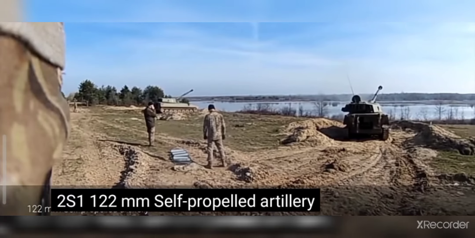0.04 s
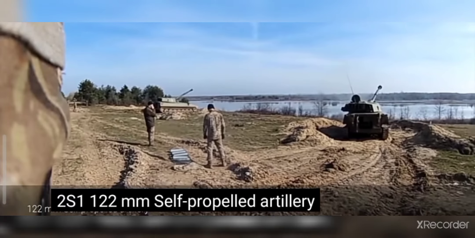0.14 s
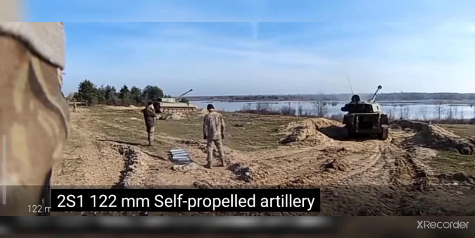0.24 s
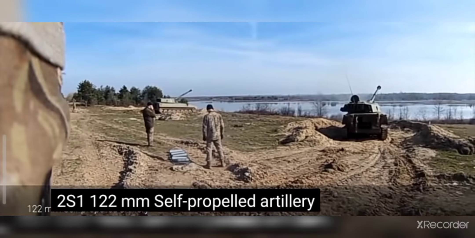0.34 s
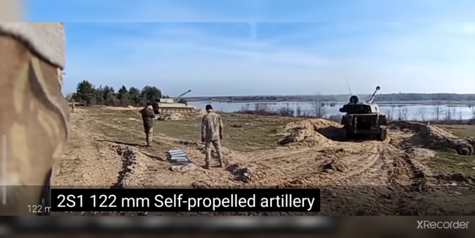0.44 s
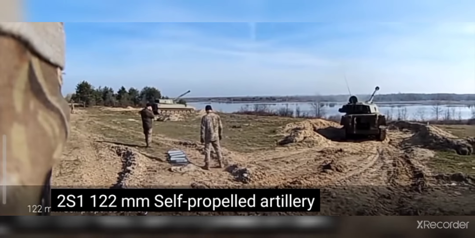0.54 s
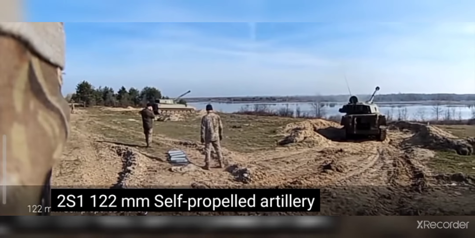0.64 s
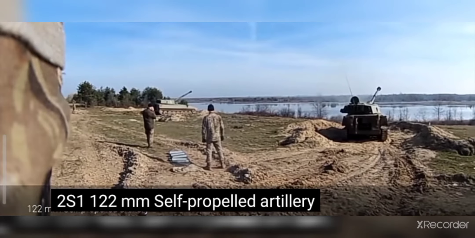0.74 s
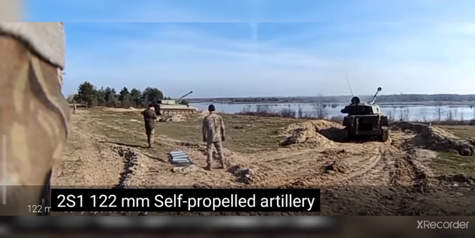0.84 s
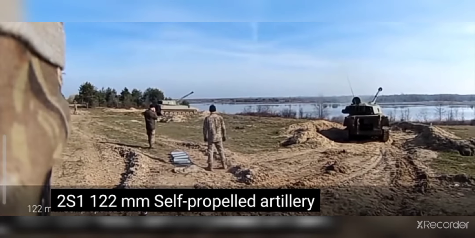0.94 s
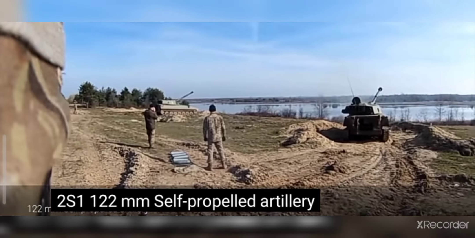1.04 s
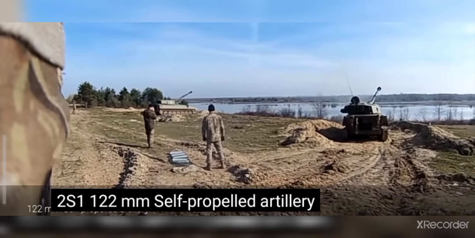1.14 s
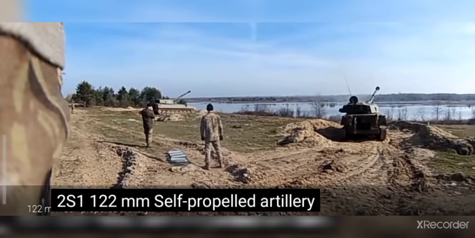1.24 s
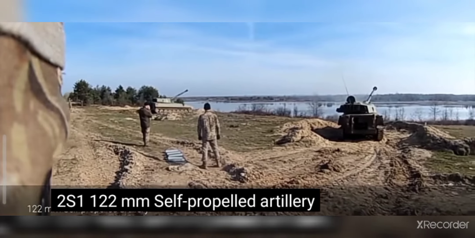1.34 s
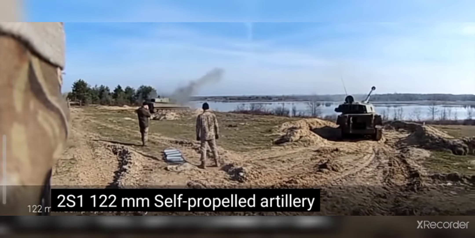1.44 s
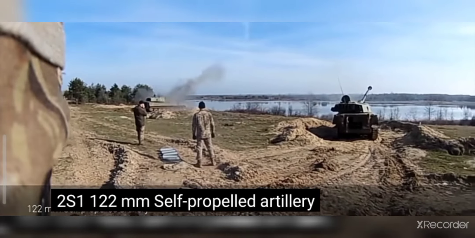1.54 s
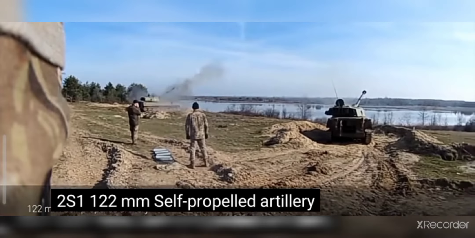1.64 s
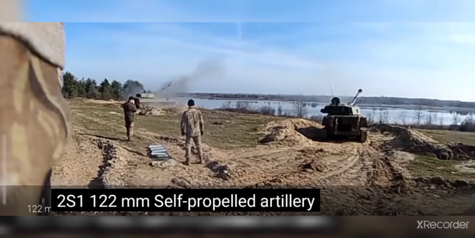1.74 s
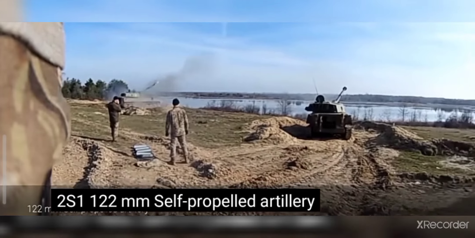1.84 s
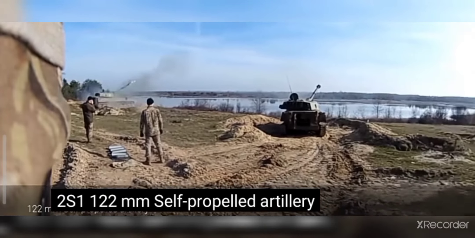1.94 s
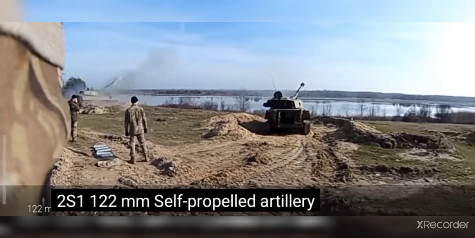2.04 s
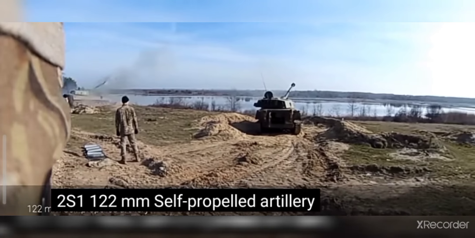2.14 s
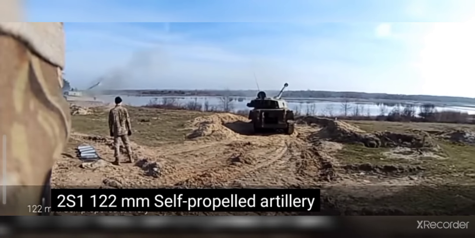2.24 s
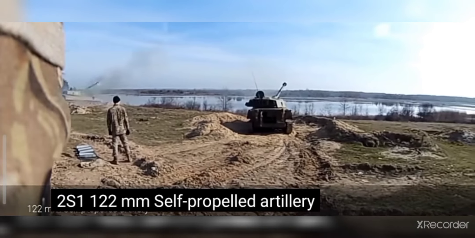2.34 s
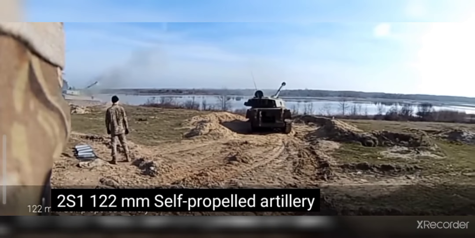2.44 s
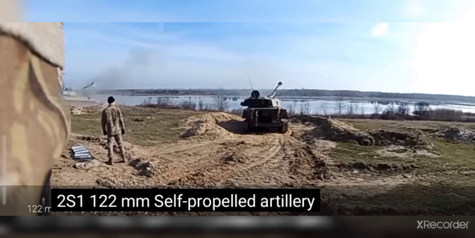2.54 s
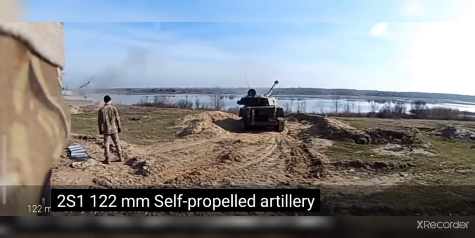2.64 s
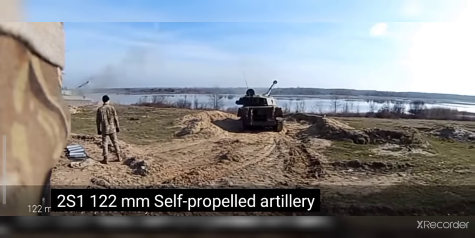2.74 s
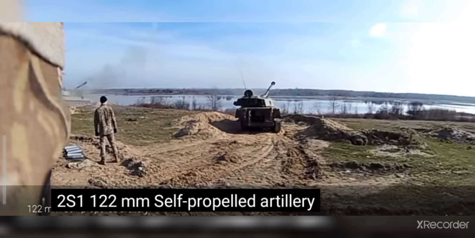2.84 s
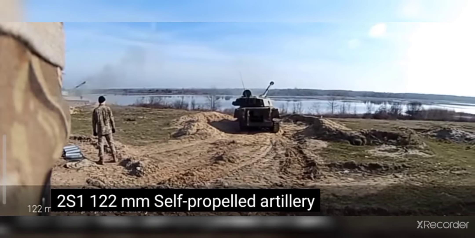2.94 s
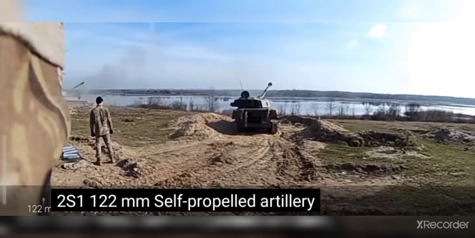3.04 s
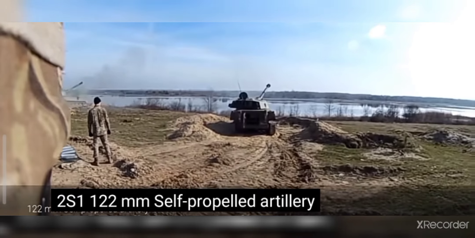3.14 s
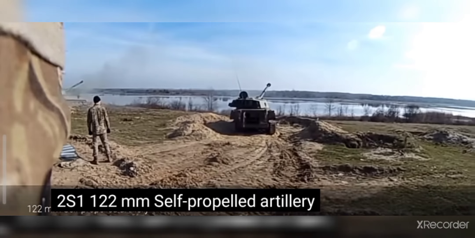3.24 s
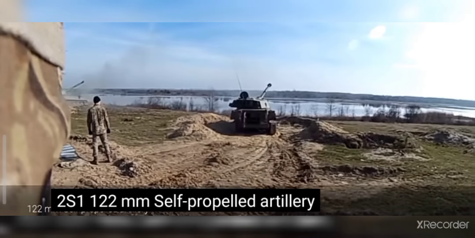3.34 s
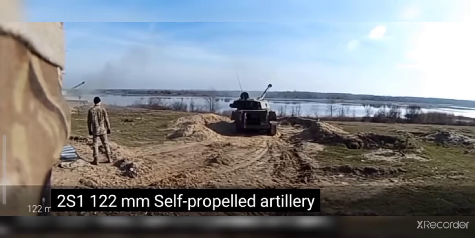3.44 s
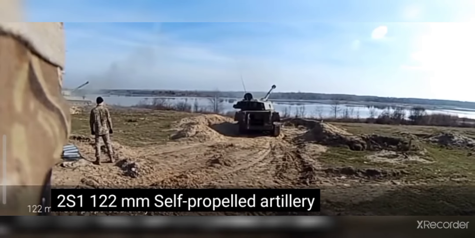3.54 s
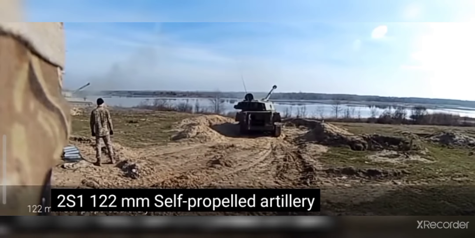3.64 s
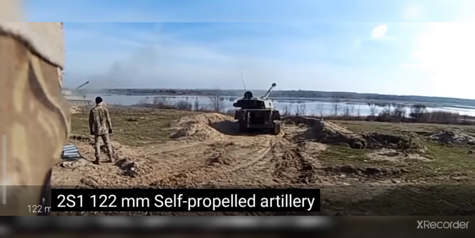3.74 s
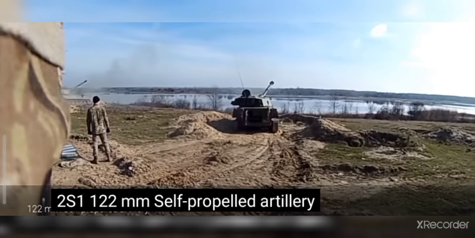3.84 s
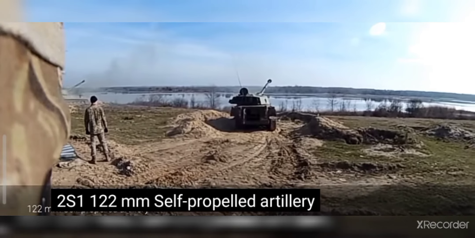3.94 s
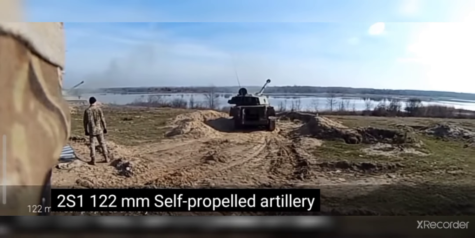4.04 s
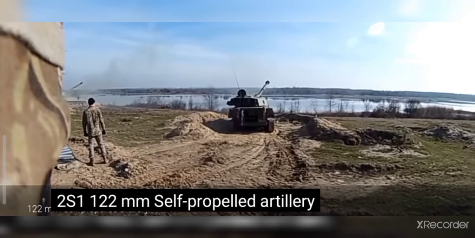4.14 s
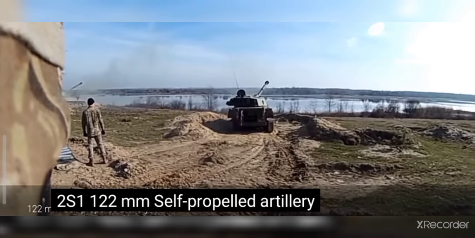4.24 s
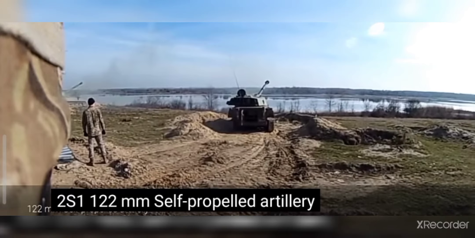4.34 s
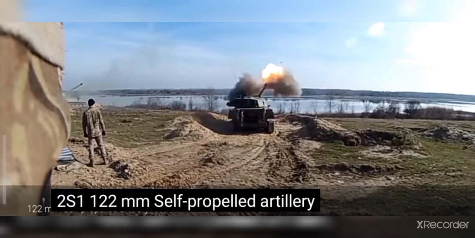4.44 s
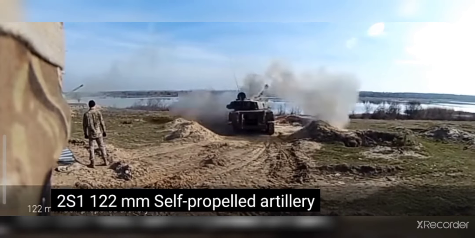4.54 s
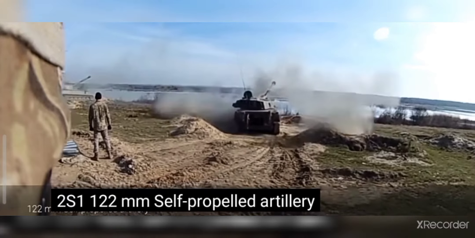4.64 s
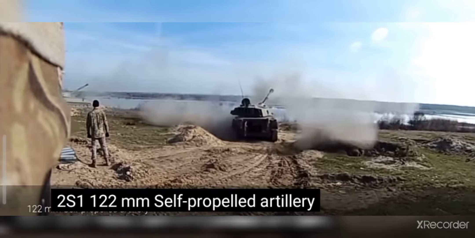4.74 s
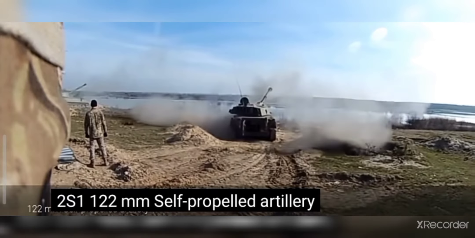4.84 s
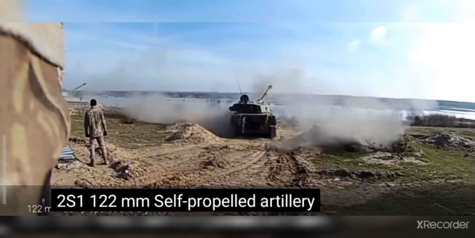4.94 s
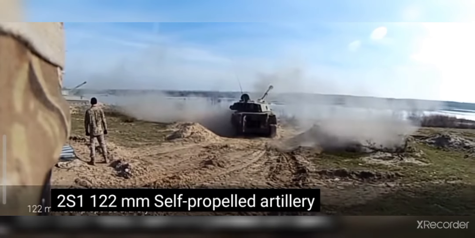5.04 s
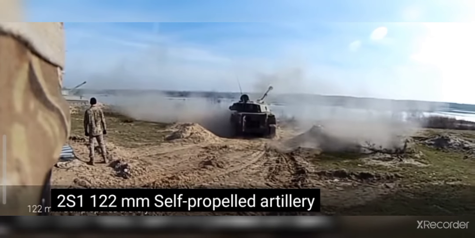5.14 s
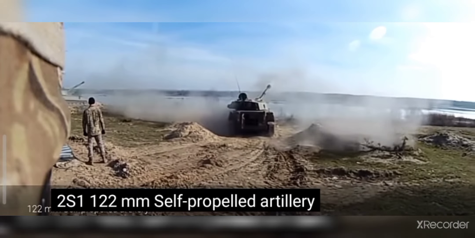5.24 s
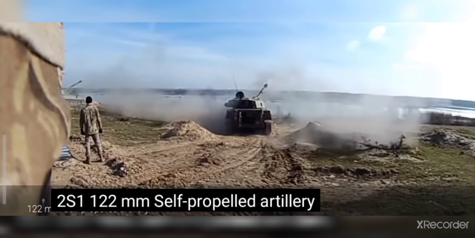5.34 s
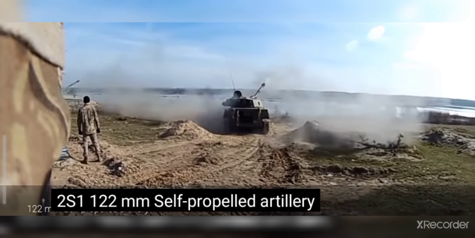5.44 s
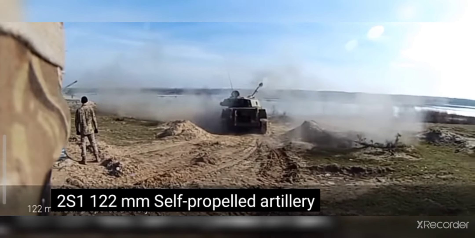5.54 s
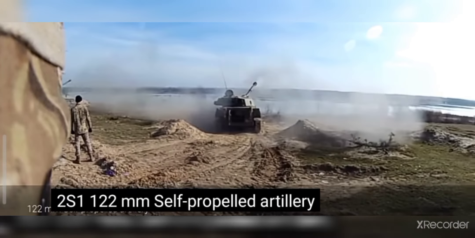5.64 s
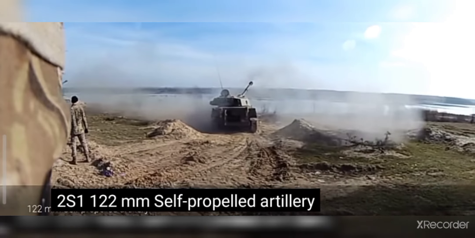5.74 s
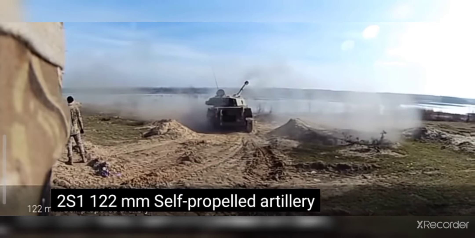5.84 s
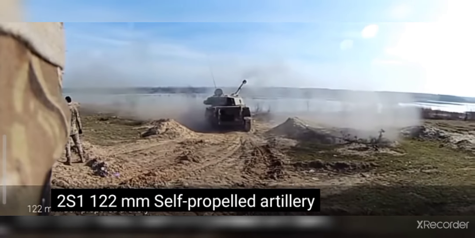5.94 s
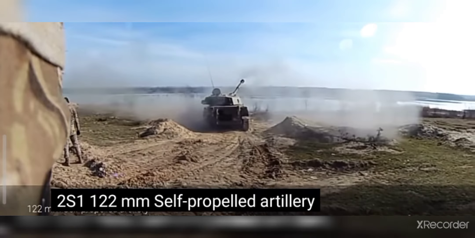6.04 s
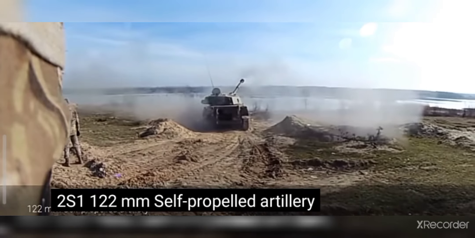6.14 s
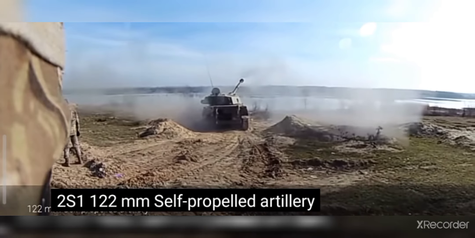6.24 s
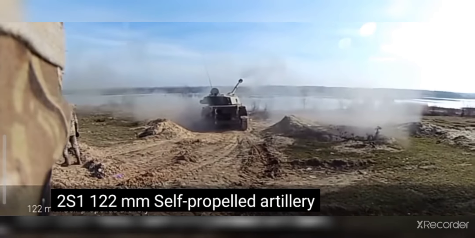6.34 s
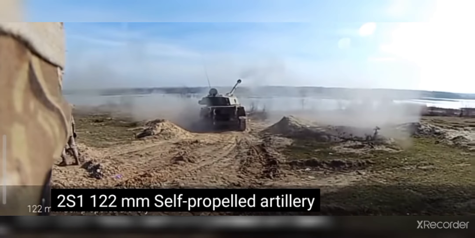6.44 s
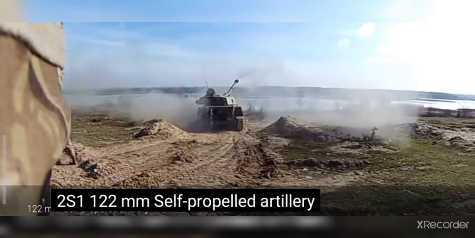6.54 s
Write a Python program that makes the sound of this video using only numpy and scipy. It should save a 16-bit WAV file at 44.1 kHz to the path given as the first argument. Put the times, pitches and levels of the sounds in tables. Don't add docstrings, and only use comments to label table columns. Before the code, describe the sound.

A steady low idle with faint clatter opens the scene. One cannon blast slams the small microphone into clipping, followed by echoes from distant woods and a thin gas leak. As it dies to a rumble, a second, stronger blast hits, with a crackling roar, a hard metallic knock, a bright ringing clang and short puffs of gas, while the engine idles on beneath.

```python
import sys
import numpy as np
from scipy import signal
from scipy.io import wavfile
from scipy.ndimage import uniform_filter1d

SR = 44100
rng = np.random.default_rng(int(sys.argv[2]) if len(sys.argv) > 2 else 0)


def transcribe(signal):
    frames = np.atleast_2d(signal).T
    limited = np.clip(frames, -1, 1)
    pcm = np.round(limited * 32767).astype(np.int16)
    wavfile.write(sys.argv[1], SR, pcm)


def volts_from_decibels(level):
    exponent = np.asarray(level, float) / 20
    return 10 ** exponent


N = 290735
T = np.arange(N) / SR
# [f/Hz, level/dB per Hz]
HISS = [(2650, -42.5), (4500, -8.5), (4700, -13), (5610, -16.5), (6670, 0.5), (7500, -1), (8720, -6),
        (9450, -17), (10000, -17), (13000, -47.5), (22000, -120)]
AIR = [(2650, -41), (4500, -12), (5710, -12.5), (6910, -2.5), (8220, -7.5), (9890, -15), (12800, -18.5),
       (14100, -16.5), (15500, -29.5), (16500, -91)]


def evened(x):
    return x / np.sqrt(np.mean(x ** 2) + 1e-20)


def add(mix, s, sound):
    part = mix[round(s * SR):][:len(sound)]
    part += sound[:len(part)]


def noise(colour, patchy_db, flicker_db, size=512):
    frames, hz = N // (size // 4) + 5, np.fft.rfftfreq(size, 1 / SR)
    a, b, patches = rng.standard_normal((frames, len(hz), 3)).T
    patches = uniform_filter1d(patches, size=5, axis=0)
    patches = evened(uniform_filter1d(patches, size=16, axis=1))
    flicker = evened(uniform_filter1d(rng.standard_normal(frames), size=4))
    f, db = np.transpose(colour)
    shape_db = np.interp(np.log(hz + 1), np.log(f + 1), db, left=-120, right=-120)
    z = (a + 1j * b) * volts_from_decibels(shape_db[:, None] + patchy_db * patches + flicker_db * flicker)
    return evened(signal.istft(z, nperseg=size, noverlap=size * 3 // 4)[1][:N])


def shock(hz):
    u = np.arange(int(1.5 * SR / hz) + 8) * 2 * np.pi * hz / SR
    return (1 - u) * np.exp(-u)


def resonate(x, hz, width):
    turn = np.exp(2j * np.pi * np.cumsum(hz) / SR)
    r = np.exp(-np.pi * width / SR)
    return 2 * (turn * signal.lfilter([1 - r], [1, -r], x / turn)).real


def engine():
    # [firing rate f/Hz, rumble level/dB]
    idle = (40.9, -45)
    # [multiple of the firing rate, level/dB, blur width f/Hz]
    orders = [(1, -54, 8), (2, -56.5, 14), (3, -48.5, 7), (4, -57.5, 17), (5, -59.5, 7.6), (6, -66, 25),
              (7, -69.5, 34)]
    # [f/Hz, level/dB per Hz]
    idle_low = [(9, -28.5), (15, -9), (43, -2), (75, -3), (97, -7.5), (128, -2.5), (152, -14.5),
                (210, -21.5), (330, -36.5), (430, -59.5)]
    # [f/Hz, level/dB per Hz]
    idle_high = [(190, -33), (330, -5), (450, -10), (750, -14), (1080, -10.5), (1400, -5), (1700, -6.5),
                 (2000, -1), (2470, -15), (2770, -10), (4090, -30.5), (6040, -26), (14500, -30.5),
                 (16000, -35.5)]
    clatter_db = -61.5
    settle_hz, settle_at_s, settle_s = 2.1, 0.4206, .07

    out = volts_from_decibels(idle[1]) * noise(idle_low, 1, 0, size=4096)
    out += volts_from_decibels(clatter_db) * noise(idle_high, 1.6, 1.4)
    rate_hz = idle[0] + settle_hz / 2 * (1 - np.tanh((T - settle_at_s) / settle_s))
    turns = np.cumsum(rate_hz) / SR
    for k, db, blur in orders:
        r = np.exp(-np.pi * blur / SR)
        draws = rng.standard_normal(N) + 1j * rng.standard_normal(N)
        uneven = signal.lfilter([1], [1, -2 * r, r * r], draws)
        steady = 1.24 * (k == 3)
        turn = np.exp(2j * np.pi * (k * turns + rng.random()))
        blurred = evened((uneven * turn).real)
        out += volts_from_decibels(db) * (steady * turn.real + (.7 - .35 * steady) * blurred)
    return out


def puffs():
    # [t/s, level/dB, length/s]
    puff_list = [
        (2.003, -64.5, 1.38),
        (3.776, -64.5, 0.059),
        (4.019, -81, .05),
        (4.135, -91, .03),
        (5.277, -42.5, 0.047),
        (5.29, -57, 0.65),
        (5.39, -53, .11),
        (5.548, -48, 0.077),
        (5.625, -57.5, 0.1),
    ]
    gas = noise(HISS, 2.1, 1.3) + 0.63 * noise(AIR, 1.6, 1.4)
    gate = np.zeros(N)
    for s, db, length in puff_list:
        u = np.linspace(0, 1, int(length * SR))
        add(gate, s, volts_from_decibels(db) * np.minimum(u / 0.13, 1) * (1 - u ** 1.23))
    return gas * gate


def vent():
    # [t/s, level/dB, centre f/Hz]
    vents = [
        [(1.5, -40, 2920), (2.2, -61, 2900), (2.45, -58, 2900), (2.65, -54, 2900), (3.25, -63, 2770)],
        [(4.75, -30.5, 3000), (4.97, -32.5, 3000), (5.1, -30.5, 3100), (5.25, -39.5, 3680), (5.33, -41, 3090),
         (5.7, -42, 2880), (6.45, -60, 2800)],
    ]
    out = np.zeros(N)
    gas = noise([(1500, 5.5), (4200, -2.5), (4800, -18)], 2.5, 0.86)
    for rows in vents:
        s, db, hz = np.transpose(rows)
        on = (T > s[0]) & (T < s[-1])
        t, jet = T[on], gas[on]
        for _ in range(2):
            jet = resonate(jet, np.interp(t, s, hz), 1000)
        gate = np.clip(np.minimum(t - s[0], s[-1] - t) / 0.04, 0, 1)
        out[on] = volts_from_decibels(np.interp(t, s, db) - 2.5) * evened(jet) * gate
    return out


def metal(hit, modes, burst_db, burst_s):
    t = np.arange(SR // 2) / SR
    ring = np.zeros(len(t))
    for hz, db, t60, beat_hz, swell in modes:
        tone = volts_from_decibels(db - 60 * t / t60) * np.sin(2 * np.pi * (hz * t + rng.random()))
        ring += tone * (1 + 0.55 * np.cos(2 * np.pi * beat_hz * (t - swell)))
    rattle = evened(uniform_filter1d(rng.standard_normal(len(t)), size=250))
    ring = ring * (1 + 0.3 * rattle) * (1 - np.exp(-t / 0.0013))
    contact = signal.lfilter(*signal.butter(3, [800, 3200], "band", fs=SR), rng.standard_normal(len(t)))
    out = np.zeros(N)
    add(out, hit[0], volts_from_decibels(hit[1]) * (0.35 * ring + contact * volts_from_decibels(burst_db - 60 * t / burst_s)))
    return out


def breech_knock():
    # [t/s, level/dB]
    breech = (4.918, -15.5)
    # [f/Hz, level/dB, t60/s, beat f/Hz, delay of first swell/s]
    breech_modes = [(1394, -1.5, 0.21, 10, 0.018), (2040, -0.5, .15, 14, .02), (2460, -2, .1, 12, .015)]
    return metal(breech, breech_modes, burst_db=0.0, burst_s=0.24)


def spent_case():
    # [t/s, level/dB]
    case = (5.279, -17.5)
    # [f/Hz, level/dB, t60/s, beat f/Hz, delay of first swell/s]
    case_modes = [(1010, -9, 0.72, 12, 0.043), (1180, 2, 0.03, 5, 0), (1625, -7.5, 0.86, 13, 0.047),
                  (2185, -6, 0.26, 15, 0), (2543, 3.5, 0.39, 12.4, 0.016), (2724, -3, 0.44, 11, 0.037),
                  (3090, -11, 0.63, 9, 0.076), (4720, -16.5, 0.24, 10, 0.063), (7340, -21, 0.29, 10, 0.033)]
    return metal(case, case_modes, burst_db=1.2, burst_s=0.064)


def slaps():
    # [t/s, peak level/dB, colour f/Hz, smear level/dB,
    # top f/Hz left by the air]
    slap_list = [(1.687, -12.5, 1000, -6, 2400), (2.092, -33, 620, -5, 1300),
                 (2.298, -22, 1000, -17.5, 3660), (2.333, -19.5, 1000, -12, 2230),
                 (2.434, -34, 630, -8, 1500), (2.467, -25, 970, -12, 1800), (2.508, -32, 840, -12, 1400),
                 (2.566, -36, 940, -5, 1600), (2.712, -38.5, 1050, 3, 2820), (2.798, -40, 640, -8, 1300),
                 (3.382, -43, 600, 6.5, 1100), (4.748, -31, 730, -10, 3000), (4.807, -14, 1640, -11, 4540),
                 (4.910, -5, 2000, -17, 3180), (5.413, -22.5, 1620, -3, 2800),
                 (5.471, -19.5, 1300, -9, 1890), (5.593, -20.5, 800, -10, 1700),
                 (5.625, -27, 800, -4.5, 1700)]
    out, t = np.zeros(N), np.arange(3000) / SR
    for s, db, hz, smear_db, top_hz in slap_list:
        scatter = volts_from_decibels(smear_db - 15 - 60 * t / 0.082) * rng.standard_normal(len(t))
        scatter[0] = 1
        air = signal.butter(4, top_hz, fs=SR, output="sos")
        add(out, s, -volts_from_decibels(db + 6.5) * signal.sosfilt(air, np.convolve(scatter, shock(hz))))
    return out


def swells(column):
    # [peak t/s, length/s, deep swell level/dB, sharp swell level/dB]
    returns = [(1.325, .035, -1, 11.5), (1.38, .02, 1.5, 2.5), (1.431, 0.032, 0.5, 4.5),
               (1.46, .02, 1.5, 7.5), (1.518, .03, -0.5, 5.5), (1.564, .1, -0.5, 10),
               (1.683, .04, 0.5, 6.5), (1.885, .15, 7, 8), (2.077, .07, 6, 0), (2.38, .12, 8, 1.5),
               (2.674, .15, 1.5, -2.5), (2.732, .06, 2.5, 5), (3.112, .2, 4, -4), (3.39, .07, 7.5, 1),
               (3.47, .1, 7, 1), (3.85, .2, 4, 2), (4.161, .1, 3.5, 2), (4.424, .05, -1, 16.5),
               (4.533, .04, 4, 0.5), (4.619, .03, 2, 12), (4.688, .05, 1, 8), (4.778, .1, 1.5, 6.5),
               (4.934, 0.051, 2, 9.5), (5.184, .08, -3.5, 0), (5.422, .08, 1, -1), (5.582, .08, 1.5, 0.5),
               (5.88, .1, -0.5, -3), (6.22, .15, 4.5, 1)]
    corners = np.array([-0.64, 0, 1])
    return sum(row[column] * np.interp(T, row[0] + row[1] * corners, [0, 1, 0]) for row in returns)


def boom():
    # [f/Hz, level/dB per Hz]
    boom_colour = [(7.1, -27), (12, -5), (38, 1.5), (90, -5.5), (110, -8.5), (140, -27.5), (240, -120)]
    wide = noise(boom_colour, 0.98, 0, size=4096)
    x = .5 * wide + resonate(wide, np.full(N, 55.7), 35)
    swell = np.sqrt(abs(uniform_filter1d(x ** 2, size=3000)) + 1e-9)
    return evened(x / swell ** .6)


def roll(gun, s0, deep, body, roar, roar_low, hiss, air):
    # [t/s, level/dB, muffling by distance/dB, fullness/dB]
    rolls = [
        [(1.33, -11.5, 21.5, 6.5), (1.55, -11, 27, 3.5), (1.76, -19.5, 21, 1.5), (2.15, -24, 20.5, -2),
         (2.55, -27.5, 25.5, -1), (3.05, -34, 25.5, -7), (3.31, -37.5, 15.5, -6), (3.42, -36.5, 15, 3),
         (4.4, -35.5, 19.5, 1)],
        [(4.42, -14.5, 11.5, 2), (4.5, -8.5, 18.5, 7), (4.74, -13, 22.5, 4), (5.0, -21.5, 14.5, 3.5),
         (5.3, -23.5, 17, 3.5), (5.7, -27.5, 19.5, 0), (6.05, -27.5, 23.5, -2.5), (6.3, -32.5, 30.5, -3.5),
         (6.5, -33.5, 16.5, -0.5)],
    ]
    # [boom excess/dB, upper parts excess/dB, hold/s, release/s]
    excesses = [
        (12, 8.5, .21, .05),
        (9, 6.5, .3, 0.066),
    ]
    # [start level/dB, first fade/(dB/s), knee/s, later fade/(dB/s)]
    dusts = [
        (-37.5, 29.5, 0.83, 13.5),
        (-31.5, 26.5, 0.64, 31.5),
    ]
    # [level/dB, extra dB lost per dB of hiss]
    air_fades = [
        (-2.5, 0.3),
        (-2, 0.2),
    ]
    die_db_per_s = 82.5 if gun == 0 else 0
    body_db, body_share, body_swell, dust_swell = -1, 0.47, .3, 0.72
    dull_start_db, dull_db_per_s, dull_over_db = -3, 4, 6.5

    since = np.maximum(T - s0, 0)
    deep_swell_db, sharp_swell_db = swells(column=2), swells(column=3)
    s, level_db, muffle_db, full_db = np.transpose(rolls[gun])
    boom_db = np.interp(T, s, level_db) - die_db_per_s * np.maximum(T - s[-1], 0)
    roar_db = boom_db - np.interp(T, s, muffle_db) + sharp_swell_db
    boom_db = boom_db + deep_swell_db
    body_db = body_db + np.interp(T, s, full_db) + body_swell * deep_swell_db
    body_db = body_db + body_share * boom_db + (1 - body_share) * roar_db

    dust_db, first_fade, knee, later_fade = dusts[gun]
    hiss_db = dust_db - first_fade * np.minimum(since, knee) - later_fade * np.maximum(since - knee, 0)
    hiss_db = hiss_db + dust_swell * sharp_swell_db
    air_db, fade = air_fades[gun]
    air_db = air_db + hiss_db + fade * (hiss_db + 28.5)

    boom_over_db, upper_over_db, hold, release = excesses[gun]
    over = np.clip(1 - (since - hold) / release, 0, 1)
    dull_db = dull_start_db + dull_db_per_s * since + dull_over_db * over
    dulled_roar = volts_from_decibels(dull_db) * roar_low + (roar - roar_low) / volts_from_decibels(dull_db)
    upper = volts_from_decibels(body_db) * body + volts_from_decibels(roar_db) * dulled_roar + volts_from_decibels(hiss_db) * hiss + volts_from_decibels(air_db) * air
    sound = volts_from_decibels(boom_over_db * over + boom_db) * deep + volts_from_decibels(upper_over_db * over) * upper
    return sound * np.clip(since / 0.0042, 0, 1)


def muzzle_blast(s0, db, length, early, early_db, bright):
    since = np.maximum(T - s0, 0)
    burning = np.clip(since / 0.001, 0, 1) * volts_from_decibels(-60 * np.maximum(since - length, 0) / 0.081)
    rising = (T < s0 + .003) * volts_from_decibels(early_db - 25 * np.maximum(s0 - T, 0) / early)
    out = (volts_from_decibels(db) * burning + rising) * bright
    add(out, s0, -volts_from_decibels(3.5) * shock(64))
    return out


def ground_wave(s0, ground_db, shake_db, shake_rise, deep):
    out = (T < s0) * volts_from_decibels(shake_db - shake_rise * (s0 - np.minimum(T, s0))) * deep
    u = np.arange(-.03, .008, 1 / SR)
    push = np.where(u < 0, -.6 * np.exp(u / .006), np.sin(np.pi * u / .008))
    add(out, s0 - .037, volts_from_decibels(ground_db) * push)
    return out


def guns():
    # [t/s, level/dB, length/s]
    cracks = [
        (1.305, -13, .022),
        (4.411, -6.5, 0.023),
    ]
    # [forerunner/s, forerunner level/dB, ground wave level/dB,
    # tremor level/dB, tremor rise/(dB/s)]
    ahead = [
        (.0068, -17.5, -30, -34, 129),
        (.016, -18, -17, -19.5, 400.5),
    ]
    # [f/Hz, level/dB per Hz]
    body_colour = [(65, -39.5), (110, 4.5), (205, -5), (241, -10.5), (432, -20), (500, -22.5), (650, -48),
                   (1100, -120)]
    # [f/Hz, level/dB per Hz]
    roar_colour = [(290, -23.5), (500, 1), (690, -2), (934, -3), (1160, -3), (1530, -2.5), (1950, -0.5),
                   (2480, -2), (2870, -1.5), (4500, -23.5), (5850, -56), (9900, -120)]

    deep = boom()
    body = noise(body_colour, 2.5, 1, size=1024)
    roar = noise(roar_colour, 2.2, 1.3)
    hiss, air = noise(HISS, 2.1, 0.87), noise(AIR, 1.5, 1.7)
    roar_low = signal.filtfilt(*signal.butter(1, 1300, fs=SR), roar)
    bright = roar - 0.26 * roar_low + 1.2 * body + .4 * hiss + 0.2 * air
    out = np.zeros(N)
    for gun, (s0, db, length) in enumerate(cracks):
        early, early_db, ground_db, shake_db, shake_rise = ahead[gun]
        out += ground_wave(s0, ground_db, shake_db, shake_rise, deep)
        out += muzzle_blast(s0, db, length, early, early_db, bright)
        out += roll(gun, s0, deep, body, roar, roar_low, hiss, air)
    return out


def scene():
    mono = engine() + puffs() + vent() + breech_knock() + spent_case() + slaps() + guns()
    return np.array([mono, mono])


def low_pass(x):
    return signal.sosfilt(signal.butter(12, 16630, fs=SR, output="sos"), x)


def record(dry):
    limit = volts_from_decibels(-9)
    x = dry[0] / limit
    busy = np.clip(6 * uniform_filter1d(1. * (abs(x) > 1.4), size=1500) - .5, 0, 1)
    give = .06 * np.tanh(x / 4)
    x = limit * (x / (1 + abs(x) ** 4.18) ** (1 / 4.92) + give)
    x = signal.lfilter(*signal.butter(1, 1.1, "high", fs=SR), x)
    x = signal.sosfilt(signal.cheby2(14, 80, 16950, fs=SR, output="sos"), x)
    blocks = np.repeat(rng.random(N // 1024 + 1) < .65, 1024)[:N]
    wander = np.cos(np.cumsum(rng.standard_normal(N)) * .4)
    above = signal.cheby2(12, 90, 3600, "high", fs=SR, output="sos")
    side = signal.sosfilt(above, x) * wander * busy * uniform_filter1d(1. * blocks, size=300)
    side = volts_from_decibels(-9.5) * signal.sosfilt(above, side)
    return low_pass(np.array([x + side, x - side]))


dry = scene()
out = record(dry)
transcribe(out)
```